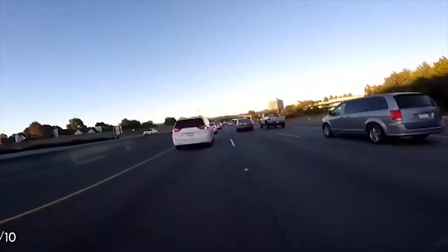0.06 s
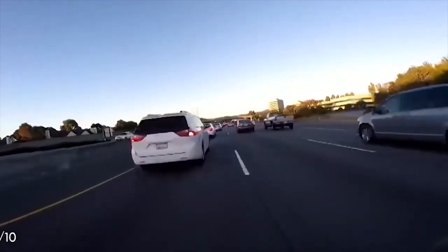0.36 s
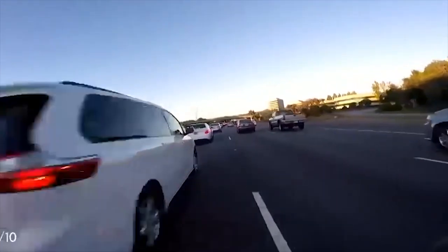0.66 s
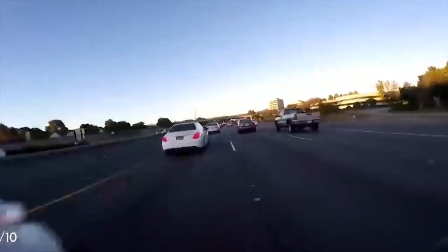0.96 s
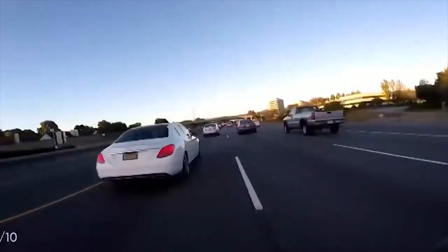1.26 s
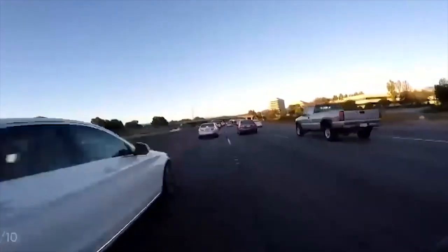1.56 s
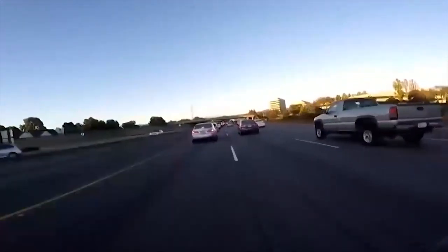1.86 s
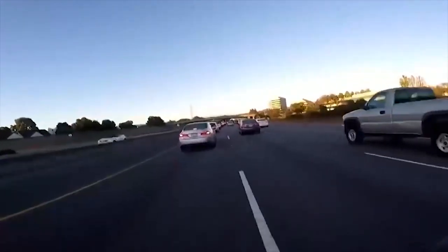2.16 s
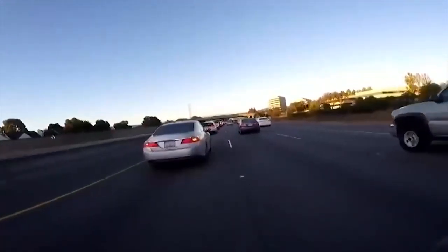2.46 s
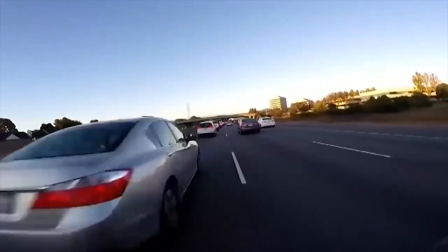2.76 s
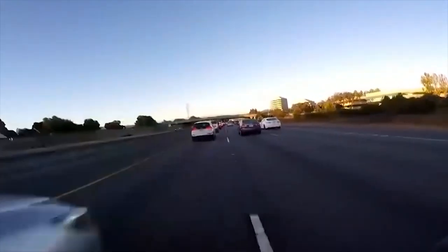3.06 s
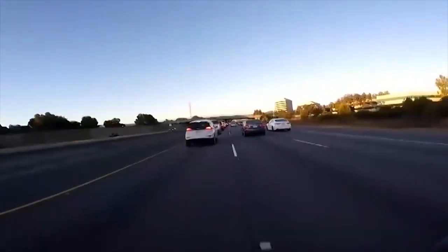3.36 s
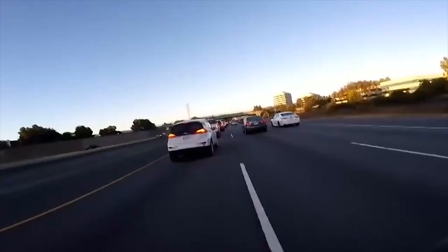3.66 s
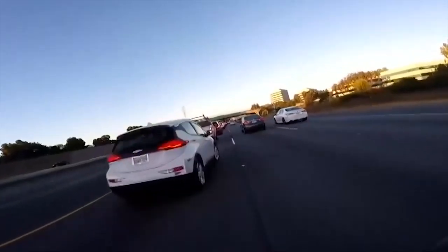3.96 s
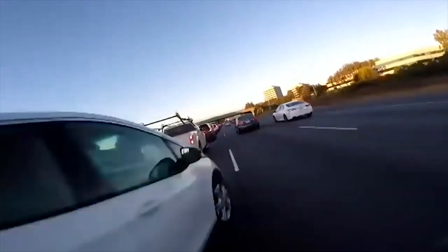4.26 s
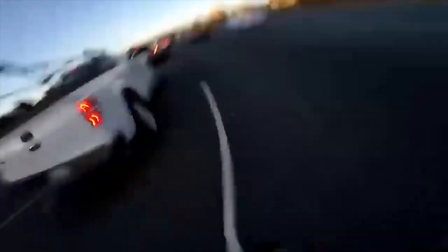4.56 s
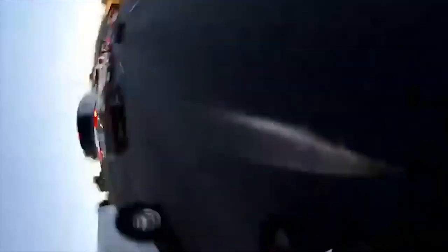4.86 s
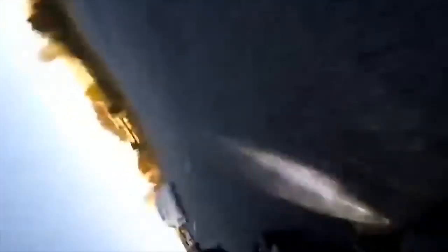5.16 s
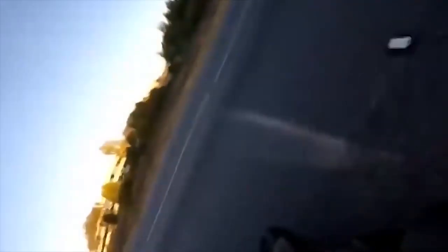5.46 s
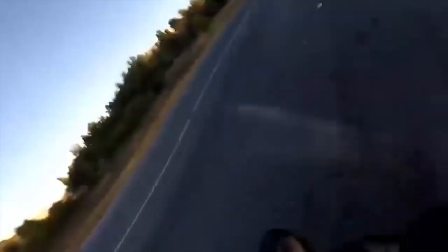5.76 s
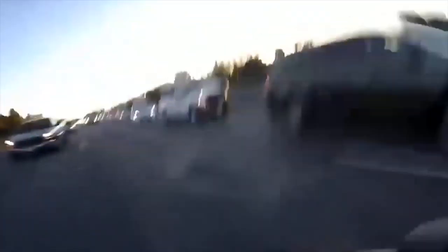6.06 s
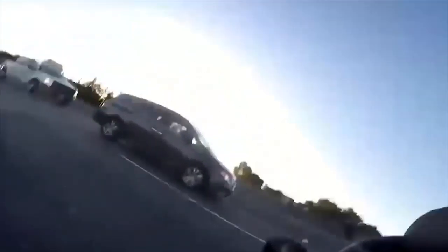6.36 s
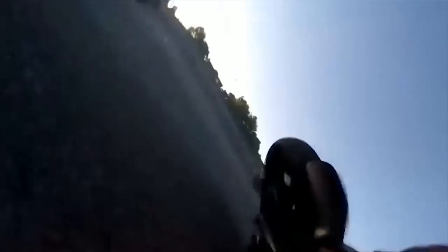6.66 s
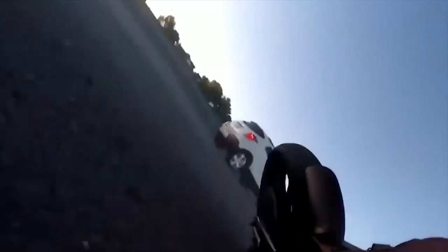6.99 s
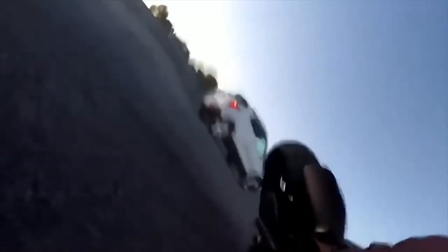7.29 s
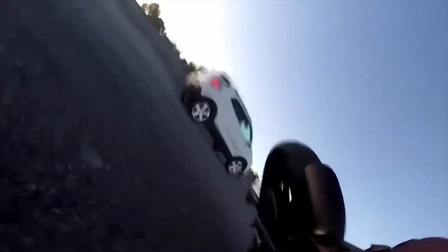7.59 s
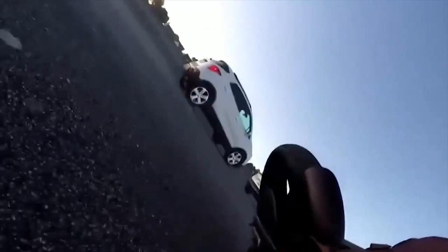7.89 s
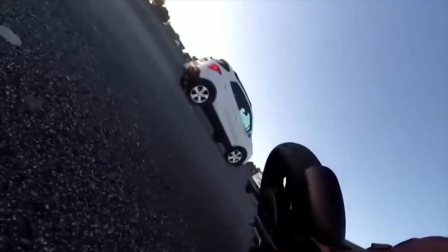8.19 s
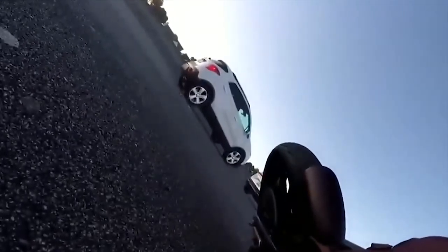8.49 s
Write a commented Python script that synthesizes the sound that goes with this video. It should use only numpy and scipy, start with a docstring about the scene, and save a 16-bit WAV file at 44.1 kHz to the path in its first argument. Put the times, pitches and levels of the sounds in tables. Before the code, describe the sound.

A motorcycle cruises at highway speed with a steady exhaust drone, tyre rush and gusts of wind buffeting the rider's microphone. At about 3.7 seconds the throttle closes and the engine tone turns hollower. At 4.6 seconds the bike hits a car with a loud, cracking bang and a crunch of buckling sheet metal. The engine revs once around 5 seconds, then runs down and dies by about 6.5. Meanwhile loose parts clatter, bodywork grinds on asphalt in bursts and metal edges give short squeals, with more knocks from 6 seconds. Near 6.7 seconds the bike slams down hard in a fizz of grit. It then slides, crackling and bumping over stones with its metal frame ringing, and stops at about 8.2 seconds. A few light, hollow knocks follow as it rocks, over faint wind and a low rumble of traffic.

```python
"""A V-twin motorcycle cruises through traffic: exhaust drone, tyre rush, wind on the rider's microphone.
The throttle closes. At 4.6 s the bike hits a car and buckles its sheet metal. The engine revs once
and runs down while loose parts clatter, bodywork grinds on asphalt and metal edges squeal.
Near 6.7 s the bike slams down in a spray of grit, then slides, its frame ringing over stones.
It stops at 8.2 s and rocks on its fairing; the traffic goes on."""
import sys
import numpy as np
from scipy import signal
from scipy.fft import rfft, irfft, next_fast_len
from scipy.io import wavfile
from scipy.ndimage import uniform_filter1d

SR = 44100
rng = np.random.default_rng(int(sys.argv[2]) if len(sys.argv) > 2 else 0)


def dump(signal):
    """Clip the signal to [-1, 1] and save it as 16-bit WAV at the path in sys.argv[1]."""
    limited = np.clip(np.atleast_2d(signal).T, -1, 1)
    pcm = np.round(limited * 32767).astype(np.int16)
    wavfile.write(sys.argv[1], SR, pcm)


N = 376173
TIME = np.arange(N) / SR

# Table levels are relative. Order: multiple of the four-stroke cycle rate.
# engine speed: t/s, cycle rate/Hz
CYCLE_RATE = [(0, 25.59), (1.4, 25.745), (2.55, 26.07), (3.4, 26.58), (3.53, 26.62), (3.68, 25.85),
              (3.82, 26.08), (4.57, 25.42), (4.78, 22.4), (4.9, 28.3), (5.02, 34.5), (5.1, 34.2), (5.3, 32),
              (5.5, 29.4), (5.7, 27.5), (5.93, 25.0), (6.1, 18), (6.7, 11)]
# engine pulls, coasts, revs, dies: t/s, level/dB, load/0-1
ENGINE_DRIVE = [(.1, -25, 0.9), (.17, -18.5, 1), (.5, -16, 0.96), (1.04, -18.5, 1), (1.32, -17, 1),
                (2.5, -17, 1), (2.97, -16, 0.94), (3.45, -17, 0.98), (3.6, -18.5, 1), (3.72, -19.5, 0.24),
                (4.1, -18.5, 0.06), (4.58, -16, 0.3), (4.71, -43, 0), (4.82, -39, 0.4), (4.9, -25, 0.44),
                (5.0, -17.5, 0.5), (5.12, -21, 0), (5.93, -18.5, 0), (6.15, -25, 0), (6.35, -23.5, 0.1),
                (6.7, -75, 0)]
# silencer and airbox at cruise: order, level/dB
CRUISE_ORDERS = [(1, -18), (2, -12.5), (3, -17.5), (4, -8.5), (5, 3.5), (6, -10.5), (7, -11.5), (8, -12),
                 (9, -3.5), (10, -5.5), (11, -6), (12, 0), (13, -1.5), (14, -19.5), (15, -17), (16, -13.5),
                 (17, -14), (18, -21.5), (19, -40), (20, -25), (21, -38), (22, -33), (23, -27.5),
                 (24, -24.5), (25, -23.5), (26, -30)]
# pipes, throttle closed: order, level/dB
UNLOADED_ORDERS = [(1, -24), (2, 0), (3, 9), (4, 2.5), (5, 4.5), (6, -11), (7, -0.5), (8, -24), (9, -4.5),
                   (10, -6), (11, -8.5), (12, -4), (13, -10), (14, -20), (16, -22)]
# silencer and airbox response: f/Hz, level/dB
PIPE_COLOUR = [(100, 1), (128, 4), (165, -4), (190, 1.5), (240, -7), (280, 1), (310, 7), (340, -5)]
# exhaust resonances: f/Hz, width/Hz, level/dB
EXHAUST_MODES = [(174, 39, 20), (230, 58, 15), (280, 56, 20), (405, 110, 13), (620, 200, -17)]
# tyre, chain and air rush: t/s, level/dB
ROAD_LEVEL = [(0, -28), (2.6, -28.8), (3.25, -27.5), (3.7, -29), (4.1, -29), (4.555, -26)]
# its spectrum: f/Hz, level/dB
ROAD_COLOUR = [(220, -10), (380, -2.5), (422, -6.5), (514, -9.5), (644, -9.5), (808, -13.5), (1160, -13.5),
               (1460, -21.5), (1910, -20.5), (2250, -26), (2740, -23), (4120, -33), (7660, -39),
               (11000, -50.5), (14000, -79)]
# engine case: f/Hz, width/Hz, level/dB
CASE_MODES = [(1172, 25, 6), (2452, 29, 4.5), (2747, 22, 5.5), (3060, 52, -8), (3420, 20, -1.5),
              (4950, 48, -7.5), (6180, 34, -9)]
# airflow: t/s, level/dB
WIND_LEVEL = [(0, -22.5), (.7, -15.5), (1.2, -17.5), (3.4, -18.5), (3.7, -13), (4.3, -16), (4.75, -17.5),
              (4.86, -23), (5.9, -21), (6.3, -21), (6.6, -31), (6.85, -33.5), (7.35, -41), (7.46, -34),
              (8.53, -33)]
# gusts from cars and tumbling: centre t/s, level/dB
GUSTS = [(0.048, -13.5), (1.68, -14.5), (5.19, -14.5), (5.42, -18.5), (6.06, -19.5), (6.22, -23),
         (6.69, -11.5)]
# wind buffet: f/Hz, level/dB
BUFFET_COLOUR = [(18, -3.5), (30, 1.5), (58, 1.5), (90, -4.5), (120, -11)]
# wind flutter: f/Hz, level/dB
FLUTTER_COLOUR = [(60, -27), (110, -1.5), (200, -3), (350, -8), (700, -27.5), (1500, -51)]
# passing cars: f/Hz, level/dB
TRAFFIC_COLOUR = [(70, 0.5), (120, -3), (330, -36), (900, -23.5), (2400, -40.5), (7000, -51), (14000, -70)]
# impacts: t/s, crack/dB, thud/dB, treble re crack/dB, t60/s
BLOWS = [(4.571, 6.5, -19, -19, 0.046), (4.577, -5, -12, -11, .025), (4.604, -4.5, -9.5, -32, 0.056),
         (4.613, -1, -17, -16, 0.056), (4.627, -12, -11, -12, 0.047), (4.74, -27, -36, -5, 0.028),
         (4.766, -21, -36, -30, 0.025), (4.809, -27, -32, -36, 0.07), (4.861, -25, -24, -14, 0.019),
         (4.897, -24, -24, -27, 0.018), (6.02, -19, -12, -12, 0.038), (6.133, -21, -32, -30, 0.024),
         (6.194, -8, -22, -15, 0.057), (6.237, -7.5, -27, -9, 0.024), (6.34, -12.5, -32, -13.5, 0.035),
         (6.679, 6, -13, -17, 0.02), (6.683, 9.5, -19, -21, 0.013), (6.696, 1.5, -22, -21, 0.05),
         (6.738, -4, -20, -19, 0.04), (6.744, 0, -15, -22, 0.046), (6.773, -2, -19, -22, 0.045),
         (7.271, -17, -31, -14, 0.027), (7.289, -11, -22, -12, 0.025), (7.307, -12, -35, -12, .012),
         (7.379, -13, -37, -4, 0.0093), (7.509, -9, -21, -8, 0.032), (7.602, -8.5, -24, -22, 0.02),
         (7.645, -15, -19, -15, 0.02), (7.697, -9.5, -20, -2.5, 0.014), (7.758, -6, -22, -7, 0.016),
         (7.776, -18, -14.5, -5, 0.037), (7.885, -10, -40, -11.5, 0.031), (7.925, -7, -36, -18, 0.025),
         (7.989, -21, -29, -11, 0.028), (8.022, -21.5, -34, -11, 0.043), (8.059, -27, -42, -18, .04),
         (8.14, -32.5, -47, -2, 0.014), (8.304, -33, -50, -2, .012)]
# cracking fairing: f/Hz, level/dB
CRACK_COLOUR = [(240, 0), (400, 9.5), (558, -2), (1250, -2.5), (1390, -4), (1910, 1), (2360, -1),
                (3050, -2.5), (4390, -9), (13500, -66)]
# splinters: f/Hz, level/dB
SPLINTER_COLOUR = [(4200, 5), (7200, -2), (9000, -13), (14000, -9.5)]
# thud: f/Hz, level/dB
THUD_COLOUR = [(40, -18), (90, 5), (250, -1), (450, -38), (900, -19)]
# metal frame: f/Hz, width/Hz, level/dB
FRAME_MODES = [(853, 65, 3.5), (1120, 93, 3.5), (1794, 25, 0), (2340, 80, -2), (3145, 125, 5.5),
               (3740, 230, -3.5), (4600, 100, -11), (5340, 330, -7.5), (6840, 260, -3.5), (7150, 150, -8)]
# hollow fairing: f/Hz, width/Hz, level/dB
FAIRING_MODES = [(677, 95, 5.5), (817, 110, 9), (1257, 120, 5.5), (1720, 210, -3), (2350, 200, -10),
                 (3500, 140, -2.5)]
# car's sheet metal: f/Hz, width/Hz, level/dB
CAR_MODES = [(169, 42, 8), (235, 50, 4), (780, 60, -6), (926, 50, 6), (1470, 84, -9)]
# bodywork digs in: t/s, length/s, rasp/dB, bite/dB, hiss/dB, swell/(dB/s)
SCRAPES = [(4.622, 0.027, -19.5, -18.5, -27.5, -28), (4.96, 0.047, -28, -28, -56, 2),
           (5.137, 0.097, -31, -18.5, -29.5, 51), (5.327, 0.086, -23, -18, -27.5, -81),
           (5.667, 0.034, -20, -17.5, -36, 40), (5.755, 0.095, -23.5, -20.5, -41, 50),
           (5.869, 0.076, -23.5, -19.5, -41, -68), (6.205, 0.04, -36, -50, -53, 0),
           (6.298, 0.025, -30.5, -36, -52, 0), (6.561, 0.059, -18, -18.5, -30, -20),
           (6.713, 0.058, -25, -22, -28, -5)]
# bodywork on asphalt: f/Hz, level/dB
GRIND_COLOUR = [(380, 5), (550, -4), (800, -0.5), (1200, -10.5), (2000, -5), (2600, -2), (3500, -2),
                (4200, -5.5), (7000, -14), (9000, -16), (14000, -24.5)]
# scraped panels: f/Hz, width/Hz, level/dB
PANEL_MODES = [(1157, 166, 3), (1500, 95, -0.5), (1936, 170, 2), (2780, 120, -2), (3475, 180, 5),
               (4300, 400, -2), (4950, 280, -2), (6320, 250, -13.5)]
# stick-slip of metal edges: centre t/s, length/s, f/Hz, jitter scale/Hz, level/dB
SQUEALS = [(5.163, .025, 6560, 80, -31), (5.255, 0.078, 6400, 70, -24), (5.214, 0.064, 3460, 91, -21),
           (5.238, 0.036, 3120, 90, -23), (5.335, 0.056, 3720, 170, -17.5), (5.383, 0.06, 5120, 150, -24),
           (5.7, 0.1, 1197, 70, -21), (5.851, 0.24, 1167, 74, -24), (5.89, 0.12, 1516, 70, -20),
           (5.85, .22, 3500, 81.4, -32), (5.998, 0.12, 3500, 25, -41), (6.056, .025, 7300, 60, -36),
           (6.393, 0.45, 3280, 25, -42), (6.58, 0.16, 1150, 28.2, -18), (7.269, 0.048, 1850, 198, -25),
           (7.305, 0.05, 5600, 256, -30)]
# flying grit: f/Hz, level/dB
SPRAY_COLOUR = [(8000, -4), (10000, -2), (14000, 2)]
# gravel under the frame: f/Hz, level/dB
GRAVEL_COLOUR = [(450, 1), (650, -4), (1000, -8), (1400, -4.5), (2300, -7.5), (2650, -20), (3180, -7),
                 (4400, -15), (7100, -20), (8200, -19), (11000, -21), (14000, -32)]
# whole bike shaking: f/Hz, width/Hz, level/dB
JUDDER_MODES = [(117, 30, 1), (186, 95, -3.5), (309, 91, 7), (400, 52, -15)]
# frame digs in: centre t/s, half-length/s, level re steady slide/dB
SURGES = [(7.064, 0.0091, -1), (7.462, 0.021, 0.5), (7.53, 0.021, 1), (7.793, 0.018, 2)]
# fairing rocks: t/s, length/s, level/dB, t60/s
KNOCKS = [(8.159, 0.0099, -35, 0.065), (8.186, 0.016, -30.5, 0.061), (8.32, 0.006, -34, .09),
          (8.347, 0.0036, -40, 0.045), (8.39, .006, -34, .05), (8.439, 0.0041, -37, 0.033),
          (8.478, 0.02, -37.5, 0.069)]

IMPACT_S, FALL_S, SLAM_S, REST_S = 4.572, 4.92, 6.79, 8.154   # hits car, meets road, lies flat, stops


def from_db(db):
    """Decibels to gain."""
    return 10 ** (np.asarray(db) / 20)


def rms_one(x):
    """Scale to unit power."""
    return x / np.sqrt(np.mean(x ** 2) + 1e-20)


def white():
    """Gaussian noise."""
    return rng.standard_normal(N)


def drift(rate_hz):
    """Random wander; rms 1."""
    knots = rng.standard_normal(4096)
    return rms_one(np.interp(TIME * rate_hz, np.arange(len(knots)), knots))


def colour(x, spectrum):
    """Shape by a spectrum, 40 dB/octave off beyond its ends; rms 1."""
    size = next_fast_len(N)
    octave = np.log2(np.maximum(np.arange(size // 2 + 1) * SR / size, 1))
    hz, db = np.transpose(spectrum)
    beyond = np.abs(octave - np.clip(octave, np.log2(hz[0]), np.log2(hz[-1])))
    gain = from_db(np.interp(octave, np.log2(hz), db) - 40 * beyond)
    return rms_one(irfft(rfft(x, size) * gain, size)[:N])


def cut(x, hz, kind, order=4):
    """Butterworth filter."""
    return signal.sosfilt(signal.butter(order, hz, kind, fs=SR, output="sos"), x)


def resonate(x, modes):
    """Parallel resonators; rms 1."""
    out = 0
    for hz, width_hz, db in modes:
        r = np.exp(-np.pi * width_hz / SR)
        feedback = [1, -2 * r * np.cos(2 * np.pi * hz / SR), r * r]
        out = out + from_db(db) * (1 - r * r) * signal.lfilter([1, 0, -1], feedback, x + 1e-18)
    return rms_one(out)


def grit(per_s, spread_db):
    """Random clicks of uneven size; rms 1."""
    sizes = from_db(spread_db * np.minimum(rng.exponential(1, N), 4))
    return rms_one(sizes * np.sign(white()) * (rng.random(N) < per_s / SR))


def linger(clicks, tau_s):
    """Exponential tail on each click."""
    return signal.lfilter([1], [1, -np.exp(-1 / (tau_s * SR))], clicks + 1e-18)


def curves(rows):
    """Table columns as controls in time."""
    times_s, *columns = np.transpose(rows)
    return [np.interp(TIME, times_s, column) for column in columns]


def held(start_s, end_s, attack_s, t60_s):
    """Rise, hold, decay envelope."""
    rise = np.clip((TIME - start_s) / attack_s, 0, 1)
    return rise * from_db(-60 * np.clip((TIME - end_s) / t60_s, 0, 3))


def bell(centre_s, half_s):
    """Gaussian envelope."""
    return np.exp(-np.minimum(((TIME - centre_s) / half_s) ** 2, 20))


def crank(firing_s=1.4462):
    """Engine cycles counted from a front-cylinder firing."""
    cycle = np.cumsum(curves(CYCLE_RATE)[0]) / SR
    return cycle - np.interp(firing_s, TIME, cycle)


def drone(cycle, cruise_hz=26.02, tuned_hz=25.7, detune_db_per_hz=0.2):
    """Silencer booms on low orders, airbox growls on high ones; unloaded, the pipes sing."""
    rate_hz = curves(CYCLE_RATE)[0]
    orders, db = np.transpose(CRUISE_ORDERS)
    pipe_hz, pipe_db = np.transpose(PIPE_COLOUR)
    log_gain = np.log(from_db(np.r_[db[0], db, db[-1]]))
    lag = np.imag(signal.hilbert(np.r_[log_gain, log_gain[-2:0:-1]]))   # passive pipe: minimum phase
    boom, growl, pipe = 0, 0, 0
    for n, order_db in zip(orders, db):
        if n < 7:
            tone = np.cos(2 * np.pi * n * (cycle - .16) - lag[int(n)])   # silencer trails intake
            boom += from_db(order_db) * tone
        else:
            tone = np.cos(2 * np.pi * n * cycle - lag[int(n)])
            growl += np.interp(n * rate_hz / cruise_hz, orders, from_db(db)) * tone   # peaks stay put
        if n <= UNLOADED_ORDERS[-1][0]:
            unloaded = from_db(np.interp(n, *np.transpose(UNLOADED_ORDERS)))
            pipe += unloaded * np.interp(n * rate_hz, pipe_hz, from_db(pipe_db)) * tone
    level_db, load = curves(ENGINE_DRIVE)
    slack = 1 - load
    detune_db = detune_db_per_hz * np.abs(rate_hz - tuned_hz)
    boom = from_db(2.5 - detune_db - 15 * slack) * rms_one(boom)
    growl = from_db(2.5 - 21 * slack) * rms_one(growl)
    pipe = from_db(.5) * slack * rms_one(pipe)
    uneven_db = (.48 + 1.5 * (TIME > IMPACT_S)) * drift(50)   # no two charges burn alike
    return from_db(level_db + uneven_db) * (boom + growl + pipe)


def exhaust(cycle, rear_lag_cycles=.4375, blip_db=12, blip_hz_per_s=35):
    """After the hit, two unevenly spaced firings a cycle bark in the pipes, most as revs climb."""
    ragged = cycle + .003 * drift(80)
    counts = [np.floor(ragged - lag) for lag in (0, rear_lag_cycles)]
    front, rear = [np.diff(count, prepend=count[0]) for count in counts]
    pulses = (front + rear) * from_db(4 * drift(70))
    puffs = white() * linger(pulses, .0046)   # gas behind each firing
    bark = rms_one(resonate(pulses, EXHAUST_MODES) + .45 * resonate(puffs, EXHAUST_MODES))
    level_db, load = curves(ENGINE_DRIVE)
    climb_hz_per_s = uniform_filter1d(np.gradient(curves(CYCLE_RATE)[0]) * SR, size=4000)
    blip = np.clip(climb_hz_per_s / blip_hz_per_s, 0, 1)
    gain = from_db(level_db - 10 + blip_db * blip) * (1 - load) * (TIME > IMPACT_S)
    return gain * cut(bark, 710, "low", order=2)


def road(cycle):
    """Tyre and air rush until the hit; case and gears rattle in step with the engine."""
    beat = 1 + .17 * np.cos(2 * np.pi * (cycle - .22))
    rush = from_db(.36) * colour(white(), ROAD_COLOUR) * from_db(1.6 * drift(90))
    rattle = from_db(-14.5) * beat * resonate(grit(per_s=3000, spread_db=4), CASE_MODES)
    cycle_sample = (cycle % 1 * SR / CYCLE_RATE[0][1]).astype(int)   # same gear noise every cycle
    gears = from_db(-3.5) * beat * colour(white(), ROAD_COLOUR)[cycle_sample]
    rolling = np.clip((ROAD_LEVEL[-1][0] - TIME) / .007 + 1, 0, 1)
    return from_db(curves(ROAD_LEVEL)[0]) * rolling * (rush + rattle + gears)


def wind():
    """Gusty air on the microphone: low buffet, softer flutter above."""
    buffet = from_db(-1) * colour(white(), BUFFET_COLOUR)
    flutter = from_db(-7.5 + 1.4 * drift(25)) * colour(white(), FLUTTER_COLOUR)
    gust_power = sum(from_db(db) ** 2 * bell(t_s, half_s=.063) for t_s, db in GUSTS)
    airflow = np.sqrt(from_db(curves(WIND_LEVEL)[0]) ** 2 + gust_power)
    return airflow * (buffet + flutter)


def traffic():
    """Steady rumble of passing cars."""
    return from_db(-35) * colour(white(), TRAFFIC_COLOUR)


def blows():
    """Fairing cracks and metal rings over a dull thud; once flat, the bare frame clangs too."""
    crack, thud, splinter = np.zeros((3, N))
    for t_s, crack_db, thud_db, treble_db, t60_s in BLOWS:
        at = slice(int(t_s * SR), int(t_s * SR) + SR // 2)
        age_s = TIME[:len(TIME[at])]
        burst = from_db(-60 * age_s / t60_s) * (1 - np.exp(-age_s / .0006))
        crack[at] += from_db(crack_db) * burst
        splinter[at] += from_db(crack_db + treble_db) * burst
        thud[at] += from_db(thud_db) * np.exp(-age_s / .011) * (1 - np.exp(-age_s / .00083))
    shatter = colour(grit(per_s=9100, spread_db=4), CRACK_COLOUR)
    shatter += from_db(-9) * resonate(white(), FRAME_MODES)
    clang = from_db(-8.5) * (TIME > SLAM_S) * resonate(white(), FRAME_MODES)
    treble = from_db(-.5) * colour(grit(per_s=7900, spread_db=-2), SPLINTER_COLOUR)
    crunch = from_db(-7.5) * rms_one(cut(shatter, 4000, "low"))
    crunch += from_db(-14.5) * resonate(white(), FAIRING_MODES)
    bass = from_db(1.5) * colour(white(), THUD_COLOUR)
    return crack * (crunch + clang) + splinter * treble + thud * bass


def crush(length_s=.063):
    """The car's side buckles; dense creases ring its sheet metal."""
    pressing = from_db(-14) * held(IMPACT_S, IMPACT_S + length_s, attack_s=.004, t60_s=.1)
    return pressing * resonate(grit(per_s=2000, spread_db=1.5), CAR_MODES)


def clatter(per_s=17, spread_db=4.5, t60_s=.037):
    """Loose parts knock at random during the tumble."""
    hits = (rng.random(N) < per_s / SR) * from_db(spread_db * np.clip(white(), -2, 1.5))
    tumbling = held(IMPACT_S, SLAM_S, attack_s=.05, t60_s=.1)
    tick = resonate(white(), FAIRING_MODES) + from_db(-3) * colour(white(), GRIND_COLOUR)
    return from_db(-37) * linger(hits * tumbling, t60_s / np.log(1000)) * tick


def contact(fade_db_per_s=5, rise60_s=.12, t60_s=.19):
    """Rasp, bite and hiss gains: loose wobble, fading drag, hard scrapes."""
    dragging = held(FALL_S, SLAM_S, attack_s=.14, t60_s=.1) * from_db(-fade_db_per_s * (TIME - FALL_S))
    wobbling = from_db(-16.5) * held(IMPACT_S, FALL_S, attack_s=.03, t60_s=.12)
    power = np.outer(from_db([-28.5, -33, -45.5]), dragging + wobbling) ** 2
    for t_s, length_s, *bands_db, swell_db_per_s in SCRAPES:
        at = np.flatnonzero(np.abs(TIME - t_s) < .5)
        age_s = TIME[at] - t_s
        away = np.maximum(-age_s / rise60_s, 0) + np.maximum((age_s - length_s) / t60_s, 0)
        swell_db = swell_db_per_s * (np.clip(age_s, 0, length_s) - length_s / 2)
        power[:, at] += np.outer(from_db(bands_db), from_db(swell_db - 60 * away)) ** 2
    return np.sqrt(power)


def wandering(x, modes, swing_db, bend, rate_hz):
    """Modes shift in level and pitch as the contact point moves; rms 1."""
    out = 0
    for hz, width_hz, db in modes:
        warped_s = TIME + bend * drift(rate_hz) / rate_hz
        bent = np.interp(warped_s, TIME, resonate(x, [(hz, width_hz, 0)]))
        out = out + from_db(db + swing_db * drift(rate_hz)) * np.sqrt(width_hz) * bent
    return rms_one(out)


def grind():
    """Asphalt tears at the bodywork and rings its panels, brighter where it digs in."""
    rasp, bite, hiss = contact()
    stones = grit(per_s=9000, spread_db=2) * from_db(1.86 * drift(110))
    panels = wandering(grit(per_s=5200, spread_db=5.5), PANEL_MODES, swing_db=3, bend=.0124, rate_hz=45)
    tearing = colour(stones, GRIND_COLOUR) + from_db(-3) * panels
    low = from_db(-.05) * rms_one(cut(tearing, 1600, "low"))
    middle = from_db(-4) * rms_one(cut(tearing, [1600, 7000], "band"))
    high = from_db(-.5) * rms_one(cut(tearing, 7000, "high"))
    return rasp * low + bite * middle + hiss * high


def squeals():
    """Metal edges stick and slip: brief jittering tones with a faint octave."""
    out = np.zeros(N)
    for t_s, length_s, hz, jitter_hz, db in SQUEALS:
        at = np.flatnonzero(np.abs(TIME - t_s) < length_s / 2)
        swell = np.sqrt(np.abs(np.cos(np.pi * (TIME[at] - t_s) / length_s)))
        phase = 2 * np.pi * np.cumsum(hz + 1.1 * jitter_hz * drift(450)[at]) / SR
        grip = from_db(db - 2 + 4.5 * drift(400)[at])
        out[at] += swell * grip * (np.sin(phase) + from_db(-19) * np.sin(2 * phase))
    return out


def spray(start_s=6.19):
    """Fine grit fizzes over the microphone until the bike lies flat."""
    flying = from_db(-53) * held(start_s, SLAM_S, attack_s=.005, t60_s=.3)
    return flying * colour(grit(per_s=2500, spread_db=5), SPRAY_COLOUR)


def slide(slowing_s=.55, snags_per_s=260):
    """Metal drags to rest over stones: they crackle, the frame rings, the bike judders."""
    speed = held(SLAM_S, REST_S, attack_s=.018, t60_s=.1) * np.clip((REST_S - TIME) / slowing_s, 0, 1)
    rough_patch = from_db(-28.5) * held(7.41, 7.8, attack_s=.023, t60_s=.96)
    judder = np.hypot(from_db(-31.5) * np.sqrt(speed), rough_patch)
    surge_power = sum(from_db(db) ** 2 * bell(t_s, half_s) for t_s, half_s, db in SURGES)
    scrape = from_db(-27) * speed * np.sqrt(1 + surge_power)
    snags = (rng.random(N) < snags_per_s / SR) * rng.uniform(.3, 1, N)
    pressure = 1 + from_db(3.5) * np.minimum(linger(snags, tau_s=.002), 1.1)
    rubbing = pressure * grit(per_s=7000, spread_db=3)
    ringing = from_db(-.5) * wandering(rubbing, FRAME_MODES, swing_db=1.8, bend=.0053, rate_hz=36)
    gravel = from_db(-5.5) * colour(pressure * grit(per_s=5500, spread_db=3.5), GRAVEL_COLOUR)
    bursts = linger(np.abs(grit(per_s=250, spread_db=4)), tau_s=.0006) * white()
    crackle = from_db(-9) * rms_one(cut(bursts, [1800, 6500], "band"))
    bumps = cut(resonate(grit(per_s=900, spread_db=2.5), JUDDER_MODES), 650, "low")
    return scrape * (ringing + gravel + crackle) + from_db(2.5) * judder * bumps


def settle(gravel_from_s=8.29):
    """The stopped bike rocks on its hollow fairing; gravel shifts beneath."""
    rocking = sum(from_db(db) * held(t_s, t_s + length_s, attack_s=.0041, t60_s=t60_s)
                  for t_s, length_s, db, t60_s in KNOCKS)
    shifting = from_db(-44) * held(gravel_from_s, TIME[-1], attack_s=.012, t60_s=.1)
    hollow = cut(resonate(grit(per_s=2500, spread_db=3), FAIRING_MODES), 5500, "low", order=2)
    return (rocking + shifting) * hollow


def scene():
    """One microphone, both channels alike."""
    cycle = crank()
    ride = traffic() + drone(cycle) + exhaust(cycle) + road(cycle) + wind()
    crash = crush() + grind() + squeals() + slide() + clatter() + blows() + spray() + settle()
    mono = ride + crash
    return np.array([mono, mono])


def record(dry):
    """Soft overload on the peaks, then a steep low-pass."""
    ceiling, cutoff_hz = .95, 14700
    rounded = dry / (1 + np.abs(dry / ceiling) ** 6) ** (1 / 6)
    return signal.sosfilt(signal.ellip(10, .1, 90, cutoff_hz, fs=SR, output="sos"), rounded)


dry = scene()
out = record(dry)
dump(out)
```